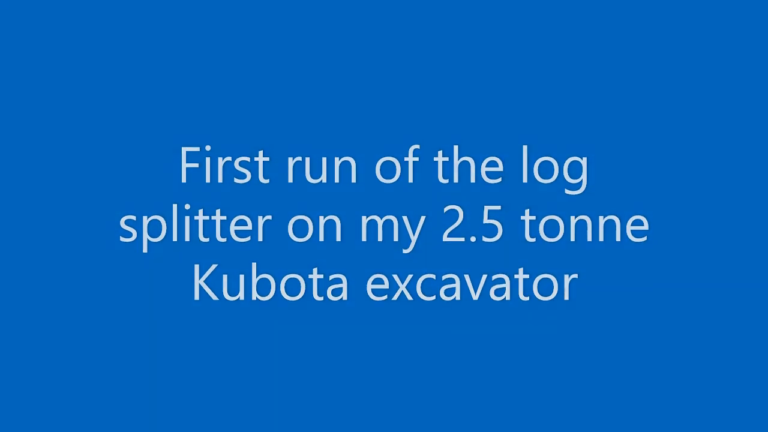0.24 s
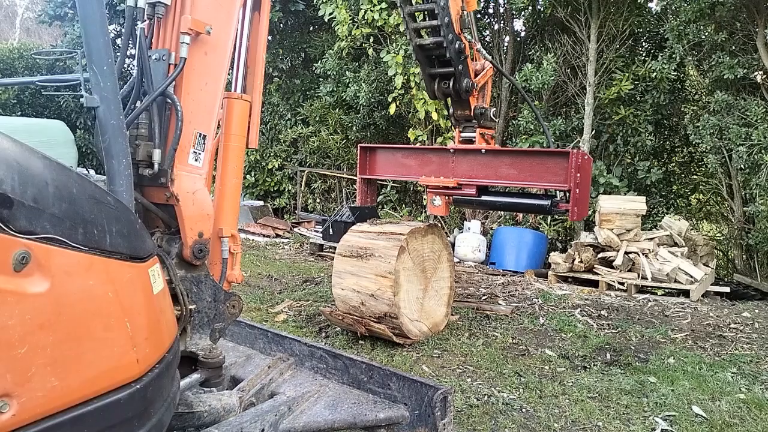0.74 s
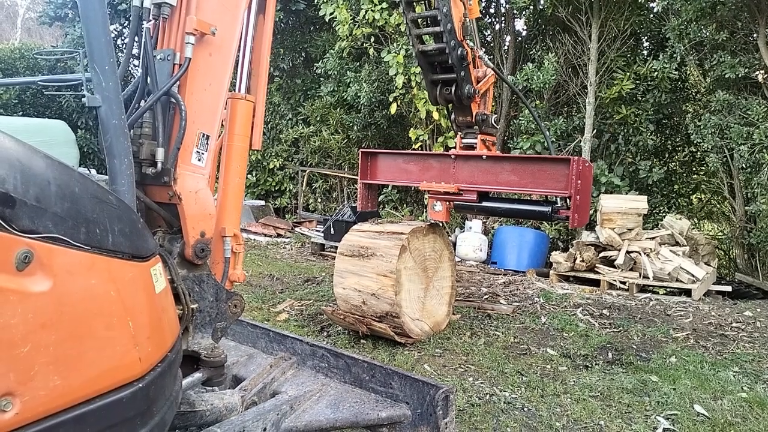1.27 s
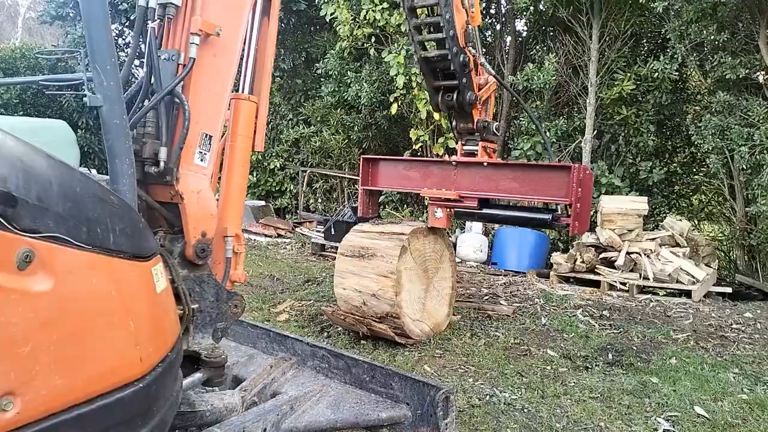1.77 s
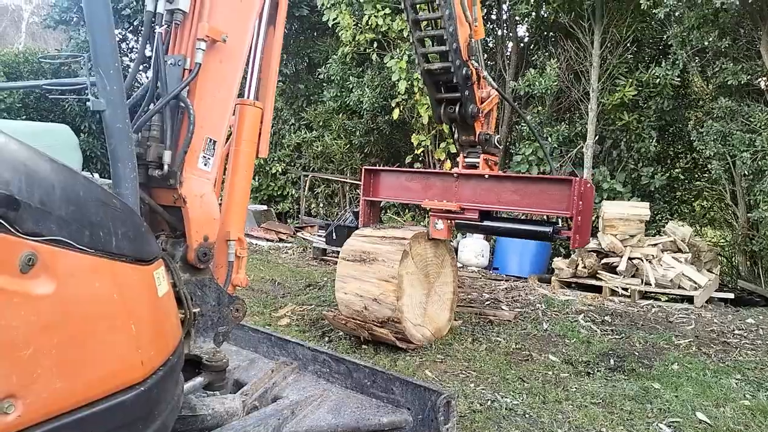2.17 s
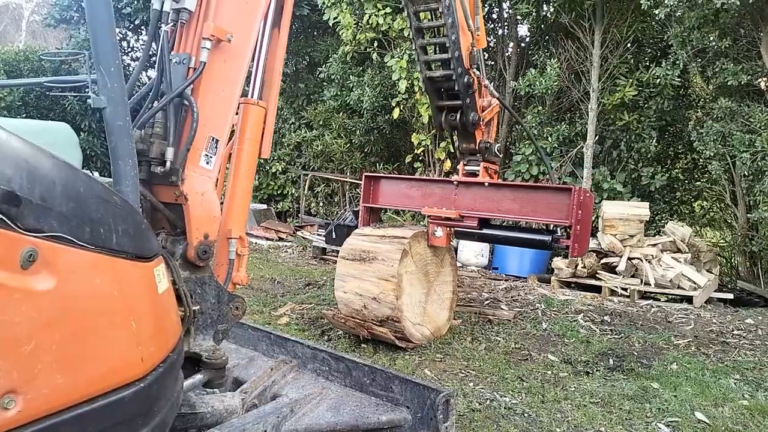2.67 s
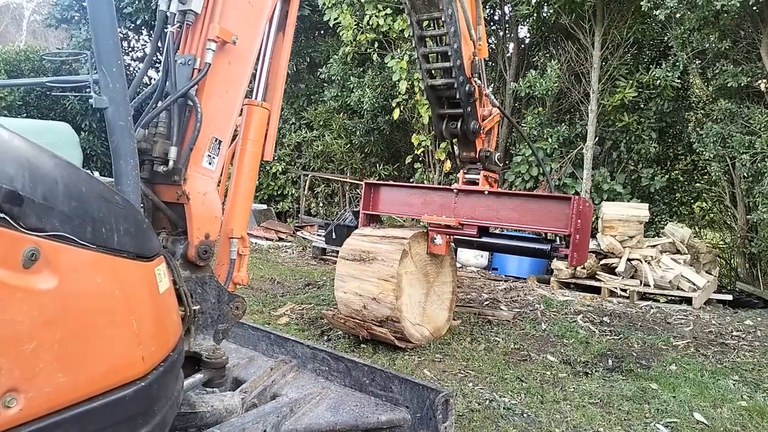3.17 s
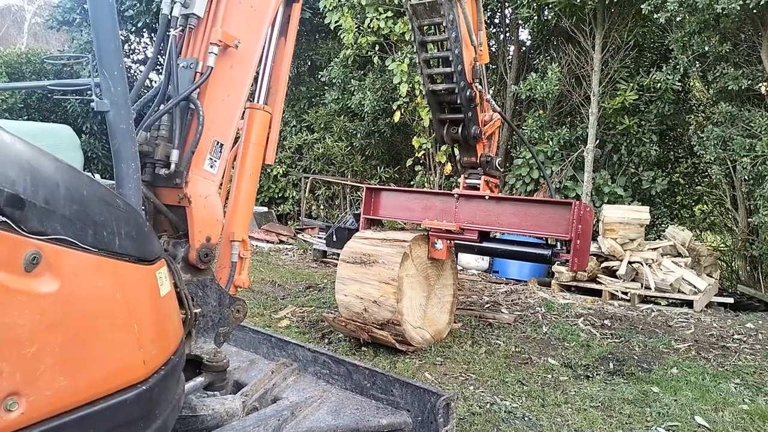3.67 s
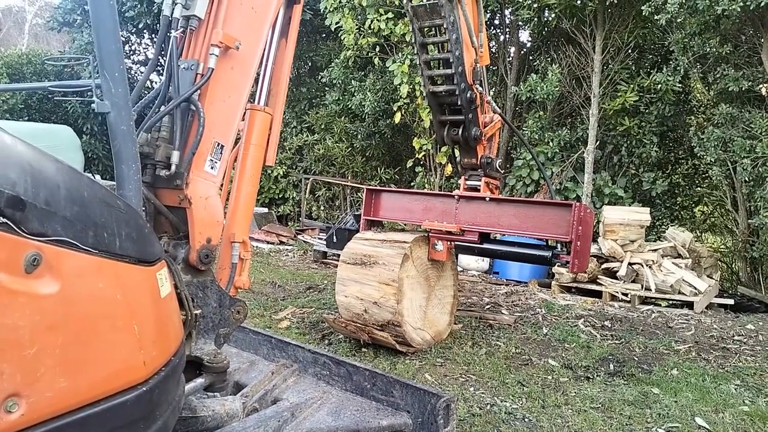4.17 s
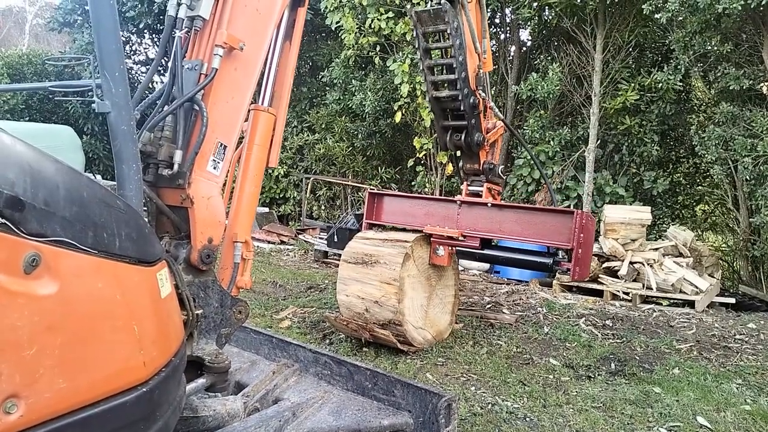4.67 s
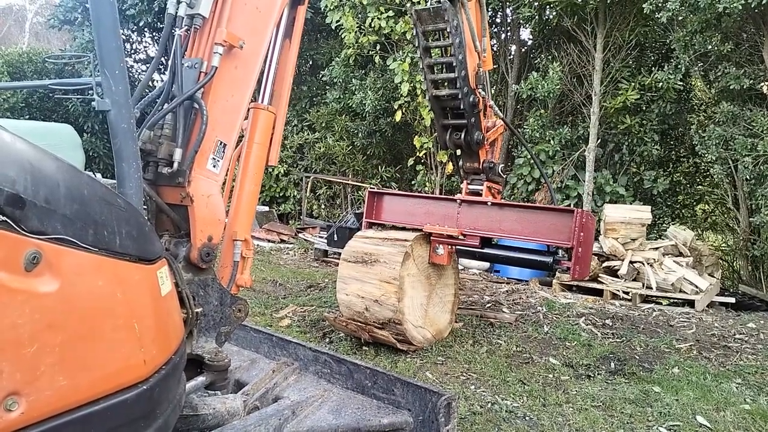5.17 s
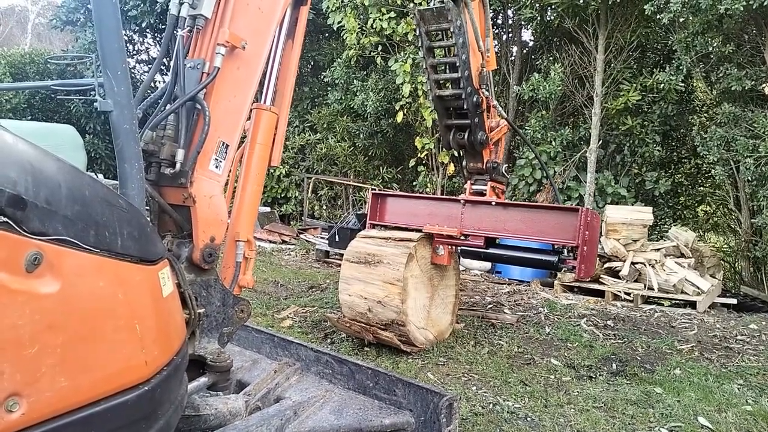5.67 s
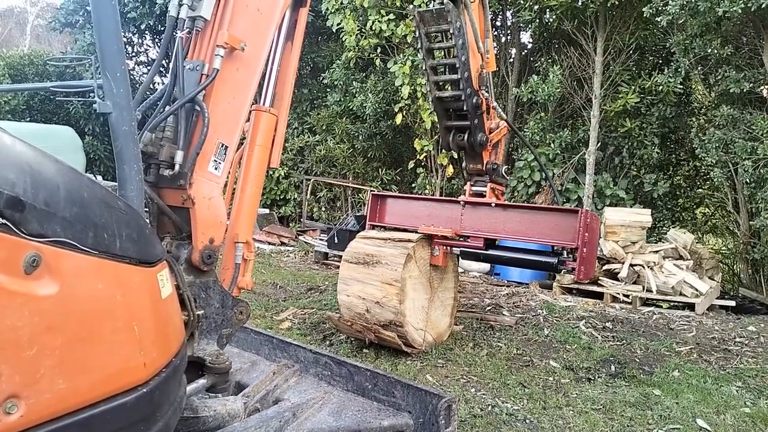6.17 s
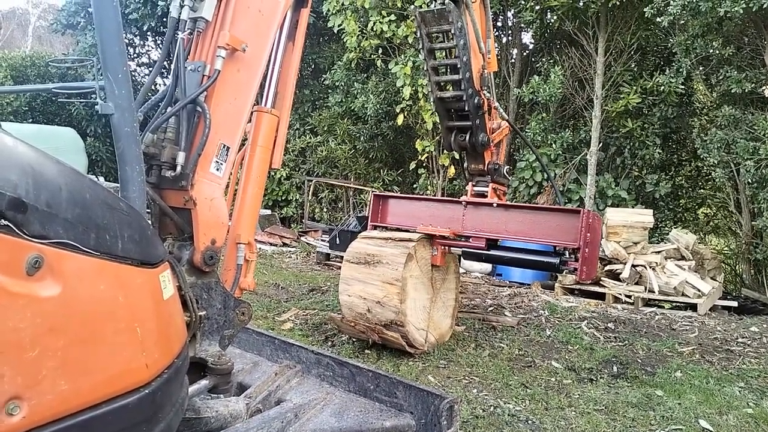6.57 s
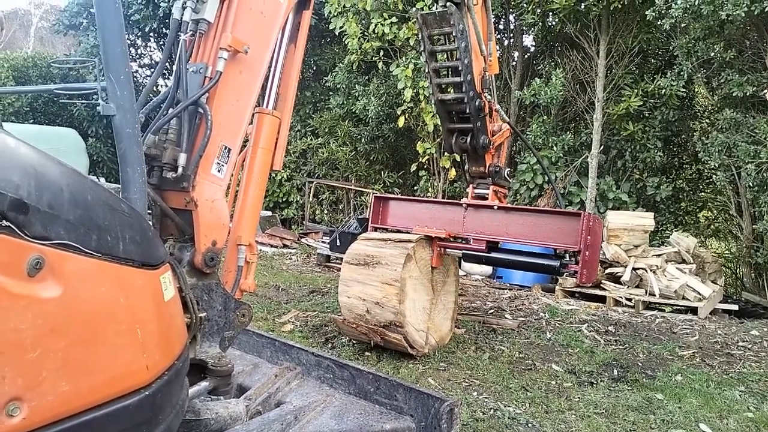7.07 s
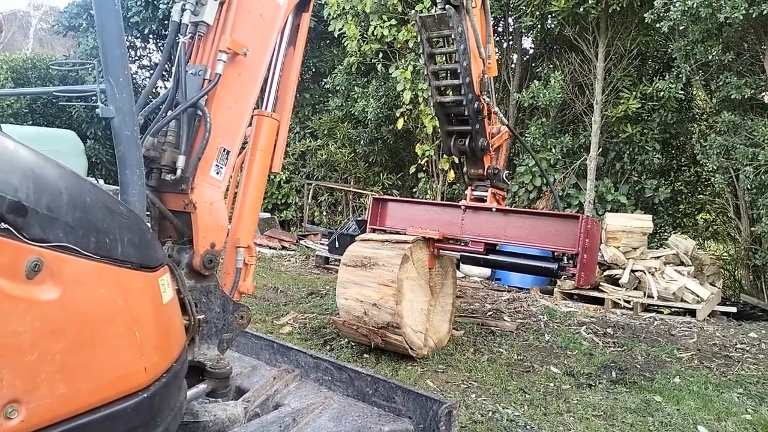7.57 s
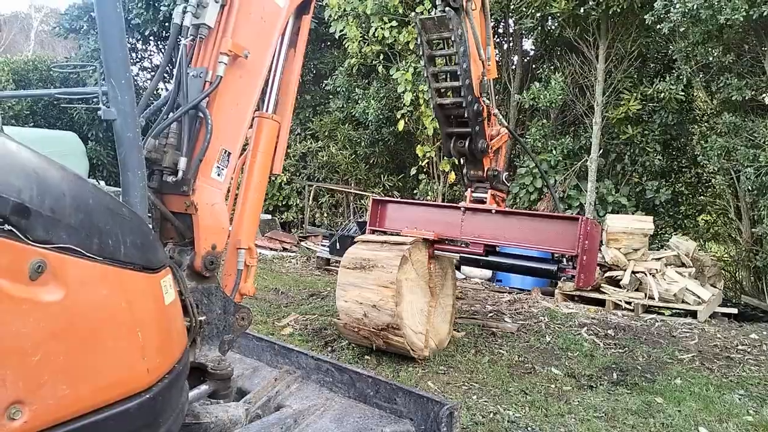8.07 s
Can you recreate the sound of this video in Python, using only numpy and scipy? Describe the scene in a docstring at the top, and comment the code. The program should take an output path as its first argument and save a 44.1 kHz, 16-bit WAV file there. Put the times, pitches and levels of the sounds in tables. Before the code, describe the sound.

After about 0.8 seconds of silence, a small diesel excavator fades in quickly, outdoors and to the left. It runs at steady revs with a throbbing exhaust, clattering valves, a panel hum that swells and fades, a light hiss and a faint hydraulic whine. At about 4.7 seconds a log a few metres away, almost straight ahead, gives a quick cluster of first cracks as a wedge is pressed in. Just after 5 seconds the revs sag slightly under load. From 5.7 to about 6.9 seconds the wood splits in a dense run of sharp, loud cracks over a bright crackle of tearing fibres. The crackle then dies down, leaving scattered cracks around 7.5 and 8.1 seconds, while the engine keeps running until the end at about 8.3 seconds.

```python
"""After 0.8 s of silence a small three-cylinder diesel excavator fades in, outdoors, to the left.
It runs at steady revs: the exhaust throbs, a cover panel hums, the hydraulic pump whines and the
valve gear clatters. At 4.7 s a log a few metres off gives its first cracks as a wedge is pressed in.
Just after 5 s the revs sag under load; from 5.7 s the fibres break in a dense run of cracks and
crackle, which thins to scattered cracks after 7 s while the engine runs on."""
import sys
import numpy as np
from scipy import signal
from scipy.fft import rfft, irfft, next_fast_len
from scipy.io import wavfile
from scipy.ndimage import uniform_filter1d, minimum_filter1d, map_coordinates

SR = 44100
rng = np.random.default_rng(int(sys.argv[2]) if len(sys.argv) > 2 else 0)


def log_audio(samples):
    """Write samples as a 16-bit WAV file to the path given in sys.argv[1]."""
    # one column per channel
    frames = np.atleast_2d(samples).T
    # limit to full scale, then quantise
    limited = np.clip(frames, -1, 1)
    pcm = np.round(limited * 32767).astype(np.int16)
    wavfile.write(sys.argv[1], SR, pcm)


N = 366912
ENGINE_DB = -21  # bus gain for the exhaust and the engine's noise layers

# Engine revs, sagging under load: t/s, firing rate/Hz
FIRING_RATE = [(.8, 47.66), (2.2, 47.72), (5.1, 47.73), (5.45, 47.2), (5.85, 46.9), (6.3, 47.2), (7, 47.36),
               (8.32, 47.36)]
def excavator():
    """The diesel fires three times in two crank turns; its tones and knocks lock to that beat."""
    rate, = curves(FIRING_RATE)
    firing_phase = 2 * np.pi * np.cumsum(rate) / SR + .15 * wobble(3)
    tones = exhaust(firing_phase, rate) + panel_hum(firing_phase) + pump_whine(firing_phase * 2 / 3)
    noises = engine_roar(firing_phase) + bodywork_drone() + mechanical_hiss()
    noises += valve_clatter(firing_phase / (6 * np.pi), rate)
    return amp(ENGINE_DB) * noises + np.sqrt(2) * tones * [[1], [0]]  # tones feed the shared row only

# Harmonics of the exhaust throb: multiple of the firing rate, level/dB
EXHAUST_HARMONICS = [(1, 0), (4, -2.5), (6, -11.5), (7, -24), (8, -21.5), (9, -23), (10, -17.5)]
def exhaust(phase, rate):
    """One puff per firing: the harmonics crest together, each wavering a little."""
    puffs = 0
    for k, db in EXHAUST_HARMONICS:
        level = amp(ENGINE_DB + db + .32 * np.sqrt(k) * wobble(11))
        puffs += level * np.cos(k * phase + .083 * k * wobble(7))
    sag_hz = rate.max() - rate  # the third harmonic weakens as the revs sag
    third = amp(-29 - 21 * sag_hz + 2.2 * wobble(9)) * np.cos(3 * phase)
    # on the flank of the silencer's resonance the second harmonic lags an eighth of a turn
    second = amp(ENGINE_DB - 1.65 + .59 * wobble(9)) * np.cos(2 * phase - np.pi / 4)
    return puffs + third + second

# Swells of the cover panel's hum: t/s, level/dB
PANEL_SWELLS = [(.85, -20.5), (1.8, -18), (3.3, -18), (4.1, -24), (5.19, -33), (5.6, -21), (5.9, -14.5),
                (6.31, -27.5), (6.55, -24.5), (6.72, -36), (7.18, -17.5), (7.82, -17), (8.3, -26)]
def panel_hum(phase):
    """Driven at its resonance by the fifth firing harmonic, the panel lags a quarter turn."""
    level_db, = curves(PANEL_SWELLS)
    return amp(level_db + 1.04 * wobble(29)) * np.sin(5 * phase + .29 * wobble(10))

# Partials of the pump whine: multiple of the shaft speed, level/dB
PUMP_PARTIALS = [(20, 3), (25, 3)]
def pump_whine(shaft_phase):
    """The hydraulic pump turns with the shaft and sings two fluttering tones."""
    return amp(-37.5) * sum(amp(db + 2.54 * wobble(12)) * np.sin(k * shaft_phase + .56 * wobble(12))
                            for k, db in PUMP_PARTIALS)

# Parts that knock in each four-stroke cycle: f/Hz, width/Hz, [(place in the cycle, t60/s, level/dB)]
KNOCKING_PARTS = [(680, 980, [(.12, 0.038, -6.5), (.43, .04, -9), (.8, 0.023, -6.5)]),
                  (1130, 200, [(.92, 0.035, -8), (0.49, 0.056, -13)]), (1980, 640, [(.1, 0.036, -1.5),
                  (.47, .02, -8), (0.69, 0.042, -7)]), (5020, 1370, [(.01, 0.062, -14),
                  (0.46, 0.023, -12)]), (6300, 1900, [(.01, 0.075, -28), (.57, 0.02, -19),
                  (.89, 0.021, -27)])]
def valve_clatter(cycle, rate, attack_s=.00062):
    """Each knock is a noise burst in its part's resonance, at the same crank angle every cycle."""
    out = 0
    for hz, width, knocks in KNOCKING_PARTS:
        envelope = 0
        for place, t60, db in knocks:
            since_s = (cycle - place) % 1 * 3 / rate
            knock_index = np.floor(cycle - place + 1).astype(int)
            accent_db = rng.normal(0, 1.1, int(cycle[-1]) + 3)[knock_index]
            envelope += amp(db + accent_db - 60 * since_s / t60) * np.minimum(1, since_s / attack_s)
        out += envelope * noise(lambda f: mode(f, hz, width) ** 2)
    return out

# Low modes of the log, the thud in each crack: f/Hz, width/Hz
LOG_MODES = [(520, 220), (720, 320), (1100, 300)]
# Crack cues: t/s, peak level/dB, woody ring f/Hz, then against the ring: thud/dB, snap/dB, splinter/dB
CRACK_CUES = [(4.658, -10, 1700, 1, -1.5, -35), (4.665, -11, 1590, 4, -20, -35),
              (4.686, -13, 1820, 2, -20, -35), (5.729, -9, 2320, 0, -9, -30), (5.765, -8, 1840, 4, -4, -11),
              (5.777, -2, 1940, -1, -12, -20), (5.791, -3, 1380, 5, -6, -11),
              (5.852, -13, 2200, -20, -16, -16), (5.864, -5, 2200, -11, -5, -18),
              (5.962, -4.5, 2070, -3, -22, -24), (6.018, -11, 2100, -3, -11, -21),
              (6.0579, 1, 1870, -6.5, -14, -14), (6.085, -0.5, 2020, -6.5, -3, -16),
              (6.11, -12, 1820, 4, 5, 0), (6.156, -12, 1750, -5, -6, -15.5),
              (6.18, -6.5, 1930, -3, -10, -17), (6.23, -12, 2190, -5, -9, -10),
              (6.258, -8.5, 1880, -9, 3, -6), (6.268, 0, 1980, -7, -13, -16), (6.299, -11, 2040, -6, 1, -1),
              (6.38, 0, 1670, -10, -14, -16.5), (6.435, -16, 1950, -3, 3, 2),
              (6.455, -6.5, 2150, -3, -7, -8), (6.486, -13, 1500, 12, -12, -17),
              (6.52, -2.5, 2280, -1, -7, -13), (6.551, -8.5, 1590, -5, -7, -8),
              (6.623, -8, 2330, 0, -4, -11), (6.641, 0.5, 1500, -0.5, -26, -17),
              (6.744, -13.5, 2200, -7, -7, -4), (6.866, -1.5, 1970, -12, -5.5, -13),
              (7.417, -4, 1480, -7, -8, -21), (7.504, -16, 1880, -1, 1, 3), (7.531, -7, 2000, 1, 2, -3.5),
              (8.078, -1.5, 1980, -2, -7.5, -7), (8.126, -18, 2150, 3, 0, 10), (8.289, -21, 2200, 0, 6, 4)]
def log_cracks(break_t60_s=.022, tail_t60_s=.27, tail_db=-15, snap_hz=3325):
    """Each crack is a quick break over a weaker run of splintering, through four bands of the wood."""
    out = np.zeros((2, N + SR))
    t = np.arange(SR // 8) / SR
    f = np.fft.rfftfreq(len(t), 1 / SR)
    thud = unit(sum(mode(f, hz, width) ** 2 for hz, width in LOG_MODES))
    snap = unit(mode(f, snap_hz, .52 * snap_hz) ** 3)
    splinter = unit(mode(f, 7900, 6700) ** 2)
    envelope = amp(-60 * t / break_t60_s) + amp(tail_db - 60 * t / tail_t60_s)
    for start_s, peak_db, ring_hz, thud_db, snap_db, splinter_db in CRACK_CUES:
        burst = envelope * np.sign(rng.standard_normal((2, len(t)))) * [[1], [.8]]
        burst[0, :2] = 2.7  # the break itself
        ring = unit(mode(f, ring_hz, .85 * ring_hz) ** 3)
        wood = ring + amp(thud_db) * thud + amp(snap_db) * snap + amp(splinter_db) * splinter
        crack = irfft(rfft(burst) * wood, len(t))
        start = round(start_s * SR)
        out[:, start:start + len(t)] += amp(peak_db) * crack / np.abs(crack[0]).max()
    return out[:, :N]

# Colour of the finest splinters: f/Hz, level/dB
SPLINTER_SPECTRUM = [(3530, 10), (6000, 6), (7670, 7), (9040, -3), (13300, 3.5), (14400, -11), (15000, -23)]
# Rise and fall of the tearing between the cracks: t/s, level/dB
CRACKLE_SWELL = [(5.6, -61), (5.79, -33.5), (6.3, -29), (6.62, -39.5), (7.1, -42.5), (7.9, -53),
                 (8.32, -52.5)]
def fibre_crackle(snaps_per_s=450, decay_s=.0033):
    """Tearing fibres: tiny random snaps roughen a fine, bright noise and a coarser one under it."""
    snaps = (rng.random(N) < snaps_per_s / SR) * amp(4 * rng.exponential(size=N))
    tearing = 1 + unit(signal.lfilter([1], [1, -np.exp(-1 / (decay_s * SR))], snaps))
    fine = unit(tearing * noise(lambda f: amp(along(SPLINTER_SPECTRUM, f))))
    coarse = amp(-7) * unit(tearing * noise(lambda f: mode(f, 2900, 2300) ** 2))
    silent_start = (CRACKLE_SWELL[0][0] - .05, -120)
    level_db, = curves([silent_start] + list(CRACKLE_SWELL))
    return amp(level_db) * (fine + coarse)

# Colour of the low bed under the clatter: f/Hz, level/dB
ROAR_SPECTRUM = [(15, -41), (25, -11), (63, -11.5), (104, -8), (140, -5.5), (229, -4), (352, -9.5),
                 (575, -13.5), (642, -7.5), (789, -9.5), (854, -57), (924, -12), (1100, -25.5), (1430, -68),
                 (2420, -120)]
def engine_roar(phase):
    """Intake, fan and block roar, pulsing slightly with each firing."""
    return amp(-2 + .5 * np.cos(phase)) * noise(lambda f: amp(along(ROAR_SPECTRUM, f)))

# Resonances of the bodywork: f/Hz, width/Hz, level/dB
BODYWORK_MODES = [(170.9, 10, -11), (219, 41, -9.5), (305.1, 5.6, -9.5), (331.8, 19, -18), (528, 32, -14)]
def bodywork_drone():
    """The shaken bodywork drones in narrow bands of noise."""
    return amp(-7.5) * noise(lambda f: sum(amp(db) * mode(f, hz, width) ** 2 / np.sqrt(width)
                                           for hz, width, db in BODYWORK_MODES))

# Colour of the casing's hiss: f/Hz, level/dB
HISS_SPECTRUM = [(470, -34), (800, -18.5), (840, -1.5), (927, -0.5), (1050, -6.5), (1230, -3.5), (2190, -1),
                 (3050, -13.5), (3620, -14), (4240, -21), (5100, -17.5), (8740, -35.5), (12000, -31),
                 (14300, -47), (15000, -78)]
def mechanical_hiss():
    """The running machinery gives a nearly steady hiss."""
    return amp(-5 + .15 * wobble(4.08)) * noise(lambda f: amp(along(HISS_SPECTRUM, f)))

# Stereo width, opening toward the treble: f/Hz, left-right likeness (0 to 1)
LIKENESS = [(50, .97), (250, .88), (700, .88), (1200, .72), (1800, .56), (2500, .6), (3200, .3),
            (4300, .55), (6500, .25), (14000, .1)]
# Stereo balance: f/Hz, level of left over right/dB
BALANCE = [(100, -.2), (150, .8), (220, -.6), (330, -2.4), (500, 1), (770, 0), (1200, -1.7), (2400, 1.4),
           (4500, .5), (9000, .3), (14000, -.3)]
# Phase cue of a source on the left: f/Hz, lead of the left channel/rad
LEFT_LEAD = [(0, 0), (700, 1.5), (1400, 3.3), (2240, 6.3), (2600, 6.6), (3450, 12.7), (4200, 15.6),
             (15000, 47)]
def place_in_stereo(pair, leftward):
    """Mix a shared and a scattered row to left and right; leftward scales the phase cue."""
    def spread(hz):
        angle = np.arccos(np.clip(along(LIKENESS, hz), 0, 1)) / 2
        return np.array([np.cos(angle), np.sin(angle)])
    def pan(hz):
        side = np.array([[.5], [-.5]])
        lead = leftward * np.interp(hz, *np.transpose(LEFT_LEAD))
        return amp(side * along(BALANCE, hz)) * np.exp(1j * side * lead)
    shared, scattered = filtered(pair, spread)
    return filtered(np.array([shared + scattered, shared - scattered]), pan)

def amp(db):
    """Gain of a level in dB."""
    return 10 ** (np.asarray(db) / 20)

def unit(x):
    """A signal or complex response scaled to rms 1."""
    return x / np.sqrt(np.mean(np.abs(x) ** 2) + 1e-20)

def along(points, hz):
    """Read (f/Hz, value) points on a log frequency axis."""
    f, values = np.transpose(points)
    return np.interp(np.log(hz + 1), np.log(f + 1), values)

def curves(rows):
    """One value per sample for each column after the time."""
    times, *columns = np.transpose(rows)
    return [np.interp(np.arange(N) / SR, times, column) for column in columns]

def wobble(rate):
    """A smooth random curve, rate knots a second."""
    knots = rng.standard_normal(int(N * rate / SR) + 4)
    grid = np.arange(0, N + 64, 64)
    return np.interp(np.arange(N), grid, map_coordinates(knots, [grid * rate / SR]))

def filtered(x, response):
    """x through a complex frequency response."""
    size = next_fast_len(x.shape[-1] + 4096)
    return irfft(rfft(x, size) * response(np.fft.rfftfreq(size, 1 / SR)), size)[..., :x.shape[-1]]

def mode(f, hz, width):
    """Response of one causal resonance."""
    return 1j * f * width / (hz * hz - f * f + 1j * f * width)

def noise(response):
    """Two unrelated noises of one colour, rms 1."""
    size = next_fast_len(N)
    real, imag = rng.standard_normal((2, 2, size // 2 + 1))
    return unit(irfft((real + 1j * imag) * response(np.fft.rfftfreq(size, 1 / SR)), size)[:, :N])

def scene():
    """The excavator on the left; the log almost straight ahead, a little to the right."""
    machine = place_in_stereo(excavator(), leftward=1)
    log = place_in_stereo(log_cracks() + fibre_crackle(), leftward=-.1)
    return machine + log

# High cut on the whole mix: f/Hz, level/dB
HIGH_CUT = [(14200, 0), (14400, -10), (15600, -36)]
def record(dry, ceiling=.9, release_s=.074, fade_start_s=.787, fade_end_s=.82, top_hz=15900):
    """A limiter ducks the loudest cracks, the mix fades in after a silence and the top is cut."""
    t = np.arange(N) / SR
    needed_gain = np.minimum(1, ceiling / (np.abs(dry).max(0) + 1e-9))
    # the gain drops just ahead of a peak, holds about 20 ms and glides back
    held_gain = minimum_filter1d(needed_gain, size=1001, origin=400)
    release = t / release_s
    duck = np.exp(np.maximum.accumulate(np.log(1 - held_gain + 1e-9) + release) - release)
    gain = uniform_filter1d(1 - duck, size=181)
    fade = np.clip((t - fade_start_s) / (fade_end_s - fade_start_s), 0, 1) ** 1.5
    return filtered(dry * gain * fade,
                    lambda hz: amp(along(HIGH_CUT, hz)) * np.clip((top_hz - hz) / 300, 0, 1) ** 2)

dry = scene()
out = record(dry)
log_audio(out)
```